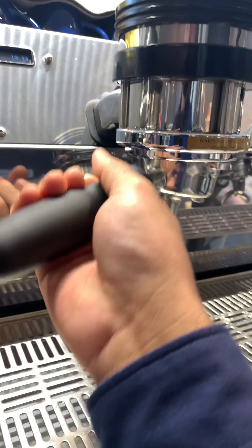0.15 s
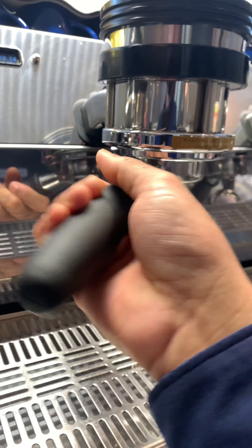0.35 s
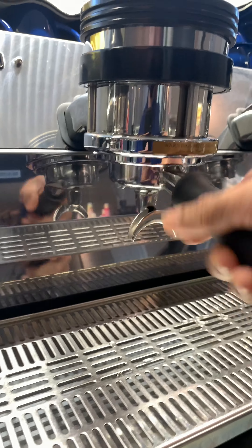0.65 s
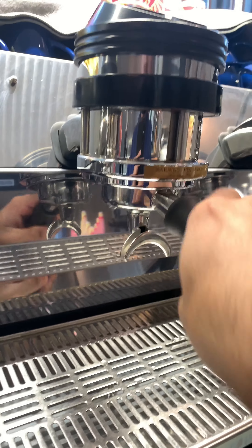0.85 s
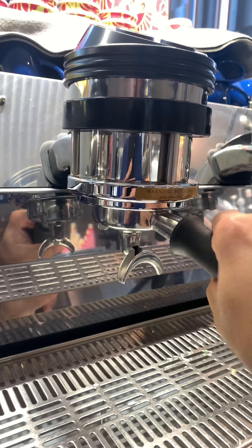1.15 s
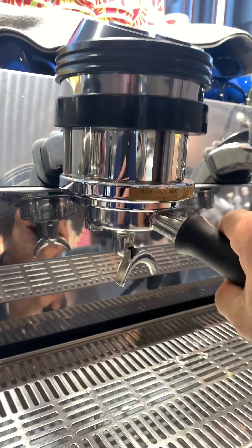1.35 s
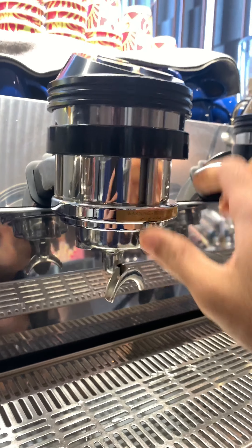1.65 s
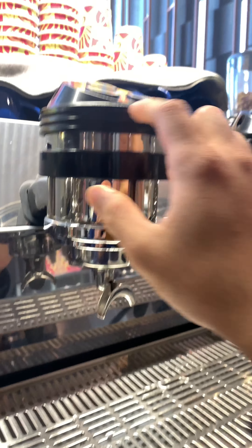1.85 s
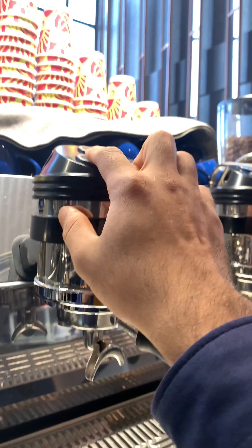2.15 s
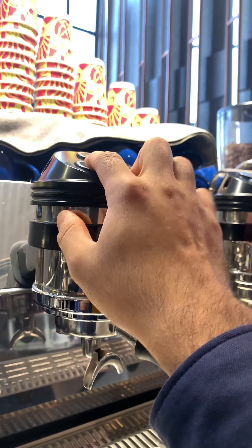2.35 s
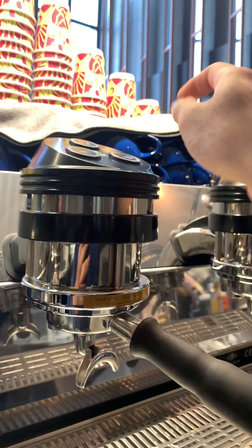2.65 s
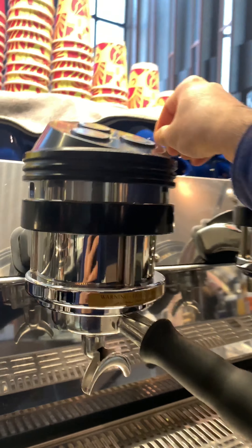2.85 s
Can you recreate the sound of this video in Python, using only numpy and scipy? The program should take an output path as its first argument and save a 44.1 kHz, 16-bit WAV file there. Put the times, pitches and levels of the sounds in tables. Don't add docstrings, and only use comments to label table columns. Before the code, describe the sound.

Steel portafilter knocks and scrapes into its socket, then a button snaps and water briefly hisses.

```python
import sys
import numpy as np
from scipy import signal
from scipy.fft import rfft, irfft, next_fast_len
from scipy.io import wavfile
from scipy.ndimage import uniform_filter1d

SR = 44100
rng = np.random.default_rng(int(sys.argv[2]) if len(sys.argv) > 2 else 0)


def store_pcm(level_fs):
    pcm = np.round(np.clip(level_fs, -1, 1) * 32767).astype(np.int16)
    wavfile.write(sys.argv[1], SR, np.atleast_2d(pcm).T)


def magnitude_from_level(level_db):
    exponent = np.asarray(level_db, float) / 20
    return 10 ** exponent


N = 132300


def evened(x):
    return x / np.sqrt(np.mean(x ** 2) + 1e-20)


def read(points, hz):
    f, value = np.transpose(points)
    return np.interp(np.log(hz + 1), np.log(f + 1), value)


def level(curve):
    time_s, level_db = np.transpose(curve)
    return magnitude_from_level(np.interp(np.arange(N) / SR, time_s, level_db, -150, -150))


def add(mix, start_s, sound):
    part = mix[:, round(start_s * SR):][:, :sound.shape[1]]
    part += sound[:, :part.shape[1]]


# freq_hz, likeness [0..1]
LIKENESS = [(30, 0.93), (100, 0.95), (250, 0.69), (600, 0.42), (1500, 0.057), (6000, 0.26)]


def noise(colour, patchy_db, flicker_db):
    frames, hz = N // 256 + 5, np.fft.rfftfreq(1024, 1 / SR)
    a, b, c, d, patch = rng.standard_normal((frames, 513, 5)).T
    patch = uniform_filter1d(patch, size=12, axis=0)
    patch = evened(uniform_filter1d(patch, size=10, axis=1))
    same = np.clip(read(LIKENESS, hz), 0, 1)[:, None]
    left = a + 1j * b
    right = same * left + np.sqrt(1 - same ** 2) * (c + 1j * d)
    flicker = flicker_db * rng.standard_normal(frames)
    gain = magnitude_from_level(read(colour, hz)[:, None] + patchy_db * patch + flicker)
    z = np.array([left, right]) * gain
    return evened(signal.istft(z, nperseg=1024, noverlap=768)[1][:, :N])


def ring(modes):
    hz, db, t60_s = np.transpose(modes)[:, :, None]
    t = np.arange(9000) / SR
    chance = rng.standard_normal((2, len(modes), 1))
    ear_rad = 0.99 * np.minimum(hz / 900, 1)
    phase = 2 * np.pi * hz * t + 3 * chance[:1] + ear_rad * chance
    return (magnitude_from_level(db - 60 * t / t60_s) * np.sin(phase)).sum(1)


def strike(modes, db, chatter_s):
    t = np.arange(1500) / SR
    grit = rng.standard_normal((3, 1500)) * np.exp(-t / chatter_s)
    contacts = grit[:1] * (rng.random(1500) < 0.25)
    out = signal.fftconvolve(ring(modes), contacts, axes=1)
    band_hz = [modes[0][0] * 1.04, modes[-1][0] * 0.917]
    band = signal.butter(3, band_hz, "band", fs=SR, output="sos")
    crack = signal.sosfilt(band, grit[1:])
    out /= abs(out).max()
    out[:, :1500] += magnitude_from_level(-5) * crack / abs(crack).max()
    return magnitude_from_level(db) * out


def clank(modes, db, chatter_s, spot_hz, reach_oct):
    hz, mode_db, t60_s = np.transpose(modes)[:, :, None]
    t = np.arange(2600) / SR
    chance = rng.standard_normal((2, len(modes), 1))
    grit = rng.standard_normal(1500) * np.exp(-t[:1500] / chatter_s)
    grit *= rng.random(1500) < 0.25
    ear_rad = 0.15
    tones = magnitude_from_level(-60 * t / t60_s) * np.sin(2 * np.pi * hz * t + ear_rad * chance)
    rung = signal.fftconvolve(tones, grit[None, None], axes=2)
    rung /= abs(rung).max((0, 2), keepdims=True)
    off_spot_db = np.minimum(6 * (np.log2(hz / spot_hz) / reach_oct) ** 2, 60)
    out = (magnitude_from_level(mode_db - off_spot_db) * rung).sum(1)
    return magnitude_from_level(db) * out / abs(out).max()


# freq_hz, density_db
RUMBLE_COLOUR = [(12, -56), (20, -43), (49, 3.5), (115, -5), (327, -16.5), (621, -27.5), (1030, -30),
                 (1160, -36.5), (4000, -55.5), (5200, -98), (8800, -120)]
# freq_hz, density_db
AIR_COLOUR = [(1470, -32), (2500, -1), (3160, -18.5), (8330, -17), (9300, -18.5), (11100, -19.5),
              (16200, -24)]


def cafe():
    rumble = magnitude_from_level(-39.5) * noise(RUMBLE_COLOUR, 1.9, 0.56)
    air = magnitude_from_level(-77) * noise(AIR_COLOUR, 2.0, 0.92)
    hum_hz, hum_db = 58.5, -46
    hum = magnitude_from_level(hum_db) * np.sin(2 * np.pi * hum_hz * np.arange(N) / SR)
    return rumble + air + hum


# freq_hz, t60_s
ROOM_DECAY = [(200, 0.82), (2000, 0.29), (12000, 0.2)]


def room(x):
    taps = np.zeros((2, SR // 2))
    at = np.arange(200, SR // 2 - 20, 20) + rng.integers(0, 20, (2, (SR // 2 - 201) // 20))
    np.put_along_axis(taps, at, rng.choice([-1., 1.], at.shape), 1)
    hz, t, z = signal.stft(taps, SR, nperseg=256)
    decay = magnitude_from_level(-60 * t / read(ROOM_DECAY, hz)[:, None])
    tail = signal.istft(z * decay, SR, nperseg=256)[1]
    return signal.fftconvolve(x, tail / np.linalg.norm(tail[0]), axes=1)[:, :N]


# time_s, level_db
FLOW = [(2.497, -85), (2.505, -37.5), (2.56, -53), (2.67, -54), (2.705, -43), (2.76, -51.5), (2.86, -53),
        (3.0, -55)]
# freq_hz, density_db
FLOW_COLOUR = [(300, -14), (600, -9.5), (2400, -10.5), (3600, -15), (4700, -17.5), (6500, -12.5),
               (9200, -12), (13500, -18.5), (16000, -40)]
# time_s, level_db
SPRAY = [(2.497, -80), (2.508, -38.5), (2.56, -44), (2.68, -47.5), (2.705, -38), (2.76, -57.5), (2.9, -65)]
# freq_hz, density_db
SPRAY_COLOUR = [(1500, -25), (2500, -4), (4400, -27), (6500, 1.5), (7500, -7), (8400, -7), (10500, -19),
                (15000, -20)]
# start_s, end_s, pitch_hz, end_pitch_hz, level_db
JETS = [
    (2.638, 2.855, 12750, 13740, -53.5),
    (2.856, 3.018, 10930, 10640, -57),
    (2.872, 3.018, 14600, 14400, -76),
]


def water():
    t = np.arange(N) / SR
    out = level(FLOW) * noise(FLOW_COLOUR, 1.6, 0.74)
    out += level(SPRAY) * noise(SPRAY_COLOUR, 1.6, 0.9)
    width_hz = 900
    r = np.exp(-np.pi * width_hz / SR)
    for start_s, end_s, hz, end_hz, db in JETS:
        u = np.clip((t - start_s) / (end_s - start_s), 0, 1)
        breath = rng.standard_normal(N) + 1j * rng.standard_normal(N)
        breath = signal.lfilter([1], np.convolve([1, -r], [1, -r]), breath)
        carrier = np.exp(2j * np.pi * np.cumsum(hz + (end_hz - hz) * u) / SR)
        jet = evened((breath * carrier).real)
        fade = np.minimum(u / 0.088, 1) * np.clip((end_s - t) / 0.0084, 0, 1)
        out += magnitude_from_level(db) * fade * jet
    return out


# start_s, cap_db, rim_db, chatter_s, spot_hz
TICKS = [
    (1.3613, -45, -68, 0.0022, 2480),
    (1.5623, -55.5, -50.5, 0.0058, 4200),
    (2.341, -52, -56, 0.0032, 3170),
    (2.3705, -39, -32, 0.0028, 3020),
    (2.4567, -37, -45, 0.002, 2000),
    (2.4680, -47, -66, 0.0031, 2400),
    (2.6991, -35.5, -33.5, 0.0054, 2900),
    (2.846, -47, -49, 0.016, 2500),
]
# freq_hz, level_db, t60_s
CAP = [(2030, -10.5, 0.021), (2450, -1.5, 0.016), (3300, 1.5, .008), (3850, -5, 0.014), (4200, -5.5, 0.012),
       (4580, -5, 0.017), (6550, 4, .008)]
# freq_hz, level_db, t60_s
RIM = [(7530, -9.5, 0.012), (8730, -9, .008), (9500, -3, 0.0032), (10400, -11, 0.0073), (13400, -19, .006),
       (14350, -13, .006)]
# freq_hz, level_db, t60_s
VALVE = [(5690, -11, 0.035), (6450, -4, 0.034), (6680, -10, 0.066), (7420, 1.5, 0.03), (8300, -6.5, 0.018),
         (9300, -1.5, 0.011), (10520, -1.5, 0.011), (11520, 1.5, 0.011), (13080, -10, 0.014),
         (14600, -23, .01)]
# freq_hz, level_db, t60_s
CASING = [(222.3, -10, 0.22), (289.5, 0.5, 0.18), (344.6, -1, 0.19), (416, -5, 0.14), (477, -9.5, 0.12)]


def button():
    out = np.zeros((2, N))
    for s, cap_db, rim_db, chatter_s, spot_hz in TICKS:
        add(out, s, clank(CAP, cap_db, chatter_s, spot_hz, 0.78))
        add(out, s, strike(RIM, rim_db, chatter_s))
    pull_s, snap_s, bounce_s = 2.4875, 2.4960, 2.5045
    snap_chatter_s = 0.0036
    add(out, snap_s, strike(VALVE, -1.5, snap_chatter_s))
    add(out, snap_s, clank(VALVE, -5, snap_chatter_s, 8900, 2))
    add(out, snap_s, clank(CAP, -19, snap_chatter_s, 2360, 0.19))
    add(out, snap_s, strike(CASING, -28, 0.0048))
    add(out, bounce_s, clank(VALVE, -13, 0.0034, 7700, 0.36))
    pull_hz, pull_t60_s = 828, 0.031
    coil = [(0.86 * pull_hz, -6, pull_t60_s), (pull_hz, 0, pull_t60_s)]
    add(out, pull_s, clank(coil, -16, 0.0047, pull_hz, 0.87) * [[1], [0.6]])
    add(out, pull_s - 0.002, strike(VALVE[:4], -29.5, 0.013))
    return out


# time_s, pressure_db
SCRAPE = [(0, -51.5), (.17, -56), (.25, -47.5), (.4, -49), (.47, -50), (.56, -48), (.7, -59), (.95, -71)]
# freq_hz, density_db
SCRAPE_COLOUR = [(120, -28.5), (200, -4.5), (550, -23.5), (721, -21), (1600, -24.5), (3000, -36),
                 (15000, -72.5)]
# time_s, level_db
RUB = [(.5, -99), (.6, -63.5), (.68, -56), (.74, -64.5), (.8, -77.5), (2.36, -100), (2.385, -71),
       (2.48, -60)]
# freq_hz, density_db
RUB_COLOUR = [(1760, -25), (3000, -1), (4780, -23), (7350, -5.5), (9210, -9), (10300, -9), (16200, -11)]
# start_s, length_s, pitch_hz, glide_hz, level_db
SQUEAKS = [
    (.775, .05, 10000, -100, -77),
    (0.926, 0.024, 10000, -100, -70.5),
    (0.969, 0.017, 10150, -450, -79),
    (.99, .038, 7100, -450, -73),
]


def friction():
    grit = rng.standard_normal(N) * magnitude_from_level(2.0 * np.minimum(rng.exponential(1, N), 4))
    grit *= rng.random(N) < 0.02
    shank, casing = [evened(signal.fftconvolve(ring(modes), grit[None], axes=1)[:, :N])
                     for modes in (SHANK, CASING)]
    slide = magnitude_from_level(11.0) * noise(SCRAPE_COLOUR, 3.3, 1.87)
    out = level(SCRAPE) * (slide + magnitude_from_level(-5.5) * shank + magnitude_from_level(6) * casing)
    out += level(RUB) * noise(RUB_COLOUR, 1.8, 2.7)
    for start_s, length_s, hz, glide_hz, db in SQUEAKS:
        u = np.arange(0, 1, 1 / SR / length_s)
        tone = np.sin(2 * np.pi * np.cumsum(hz + glide_hz * u) / SR)
        add(out, start_s, magnitude_from_level(db) * np.sin(np.pi * u) ** 0.7 * tone * np.ones((2, 1)))
    return out


# start_s, shank_db, lugs_db, casing_db, edges_db
KNOCKS = [(0.1192, -28.5, -48, -24, -46), (0.1924, -28, -14.5, -21.5, -33.5),
          (0.203, -28.5, -28, -25.5, -44), (0.2127, -26.5, -20.5, -20, -22),
          (0.2264, -22.5, -12, -19.5, -39), (0.2507, -24.5, -18, -30, -38), (.2640, -34.5, -40, -18.5, -64),
          (0.3274, -36, -28, -30, -56), (0.3405, -24.5, -10, -27.5, -24.5), (0.351, -26, -38, -21, -69),
          (.3840, -34, -20, -36, -38.5), (0.4907, -25.5, -10, -26.5, -29), (.5020, -21.5, -26, -26.5, -51),
          (0.5518, -31, -26, -30, -32.5), (.5770, -32, -46, -23.5, -66)]
# start_s, level_db, spot_hz, reach_oct
CLANKS = [(0.1203, -36, 3040, 0.18), (.1925, -25.5, 3000, 0.21), (.196, -33, 3730, .12),
          (0.2033, -22, 3030, 0.086), (0.205, -37, 4640, 0.17), (.2131, -20.5, 4800, 0.28),
          (.2165, -21, 2470, 0.13), (0.224, -16.5, 3030, 0.078), (0.2261, -29.5, 5000, 0.13),
          (0.2509, -20.5, 3030, .1), (.2505, -29, 4590, 0.059), (.276, -48, 3030, .1),
          (0.285, -45, 3030, .1), (0.3275, -24.5, 2330, 0.068), (0.3399, -17, 2890, 0.17),
          (0.3422, -32, 4500, 0.26), (0.3835, -28, 4770, .15), (0.3825, -32, 3030, 0.25),
          (.404, -34, 3280, .1), (0.4905, -22, 2470, 0.037), (.4912, -16, 3120, 0.12),
          (.4925, -39, 4760, 0.19), (.499, -19, 3030, 0.17), (.5005, -38, 2470, 0.11),
          (0.5534, -32, 2470, 0.053), (0.5536, -28, 3210, 0.053), (0.5775, -37.5, 2410, .07)]
# freq_hz, level_db, t60_s
SHANK = [(696, -5, 0.055), (941.5, -5.5, 0.11), (1028, -2, 0.086), (1136, -6, .04), (1326, -5, 0.059),
         (1542, -5, 0.073), (1594, -7, 0.05), (1830, -9.5, 0.038)]
# freq_hz, level_db, t60_s
LUGS = [(2190, -4, .02), (2330, 1.5, 0.028), (2470, 5.5, 0.034), (3030, 4, 0.042), (3210, -7, 0.043),
        (3730, 3, .022), (4200, -12, 0.0205), (4590, 0, 0.01), (4884, -1, 0.019), (5170, -31, 0.028),
        (5670, -9, .02)]
# freq_hz, level_db, t60_s
EDGES = [(8100, 3.5, 0.0051), (9000, 1.5, 0.0064), (10480, -8, 0.0088), (13700, -7, 0.0038),
         (15700, -25, .008)]


def handle():
    out = np.zeros((2, N))
    casing_pan = magnitude_from_level([[-4], [0]])
    lugs_pan = magnitude_from_level([[-3], [0]])
    for s, shank_db, lugs_db, casing_db, edges_db in KNOCKS:
        add(out, s, strike(SHANK, shank_db, 0.012))
        add(out, s, strike(LUGS, lugs_db - 12, 0.005))
        add(out, s, strike(CASING, casing_db, 0.011) * casing_pan)
        add(out, s, strike(EDGES, edges_db, 0.0037))
    for s, db, spot_hz, reach_oct in CLANKS:
        add(out, s, clank(LUGS, db, 0.0039, spot_hz, reach_oct) * lugs_pan)
    return out


def scene():
    hits = handle() + button()
    return cafe() + magnitude_from_level(-23) * room(hits) + water() + friction() + hits


def top_cut(x):
    return signal.sosfilt(signal.butter(12, 16420, fs=SR, output="sos"), x)


# freq_hz, phase_rad
LEFT_LEADS = [(0, -0.5), (600, 2.04), (1000, 5.3), (2450, 8.4), (3750, 8.5), (4500, 6), (5600, 6.9),
              (6300, 4.1)]


def record(dry):
    ceiling = 0.95
    size = next_fast_len(N + 512)
    hz = np.fft.rfftfreq(size, 1 / SR)
    left, right = rfft(ceiling * np.tanh(dry / ceiling), size)
    shared_hz, comb_hz, right_db = 7000, 4673, 2
    shared = np.clip((hz - shared_hz) / 2000 + 0.5, 0, 1)
    bass = magnitude_from_level(right_db / 2 * np.clip(1 - hz / 600, 0, 1))
    own = left / bass * np.exp(1j * np.interp(hz, *np.transpose(LEFT_LEADS)))
    delayed = right * np.exp(-2j * np.pi * hz / comb_hz)
    both = np.array([np.sqrt(1 - shared ** 2) * own + shared * delayed, right * bass])
    top_hz, low_cut_hz = 16000, 44
    edge = np.clip((top_hz + 450 - hz) / 900, 0, 1) ** 2
    edge /= 1 + (low_cut_hz / (hz + 1)) ** 4
    mix = np.clip(irfft(both * edge, size)[:, :N], -ceiling, ceiling)
    return top_cut(mix)


dry = scene()
out = record(dry)
store_pcm(out)
```